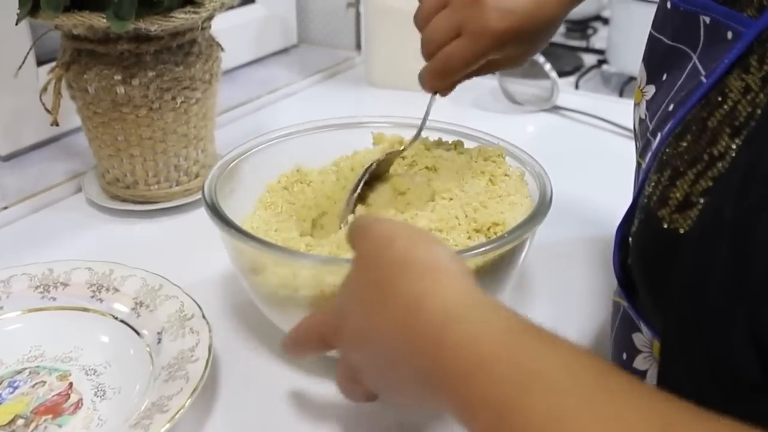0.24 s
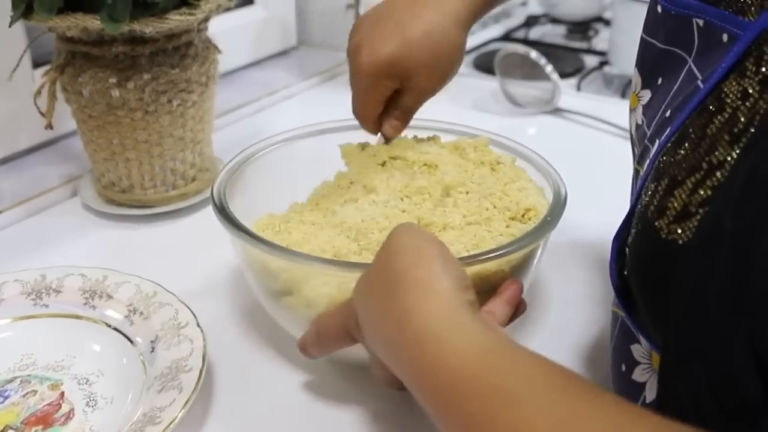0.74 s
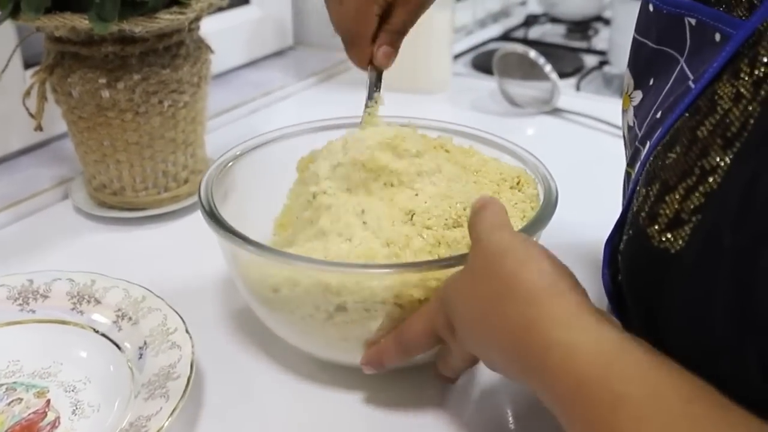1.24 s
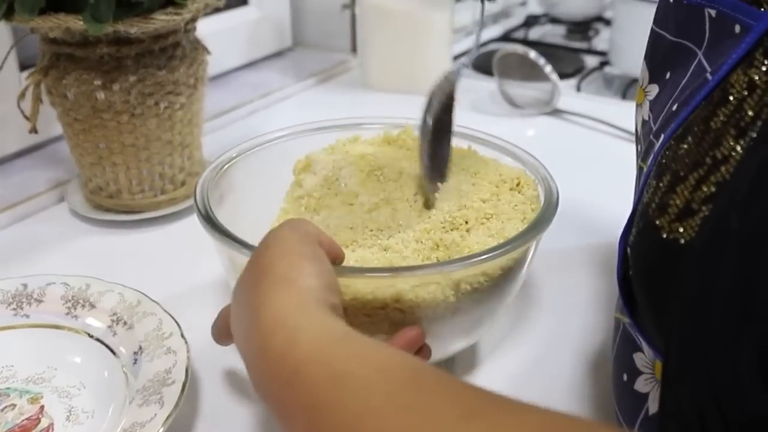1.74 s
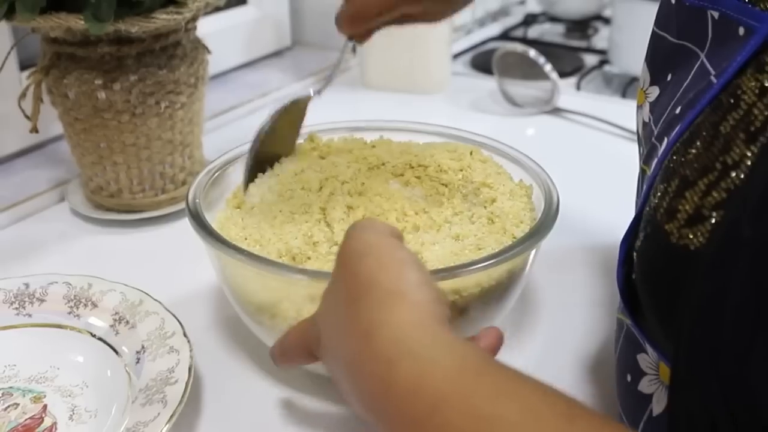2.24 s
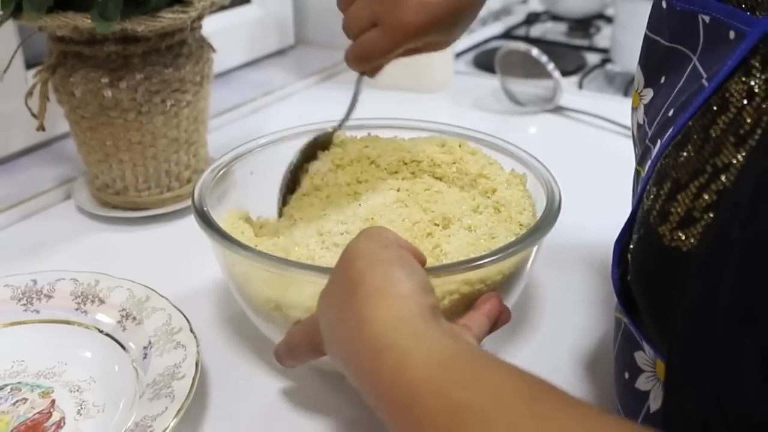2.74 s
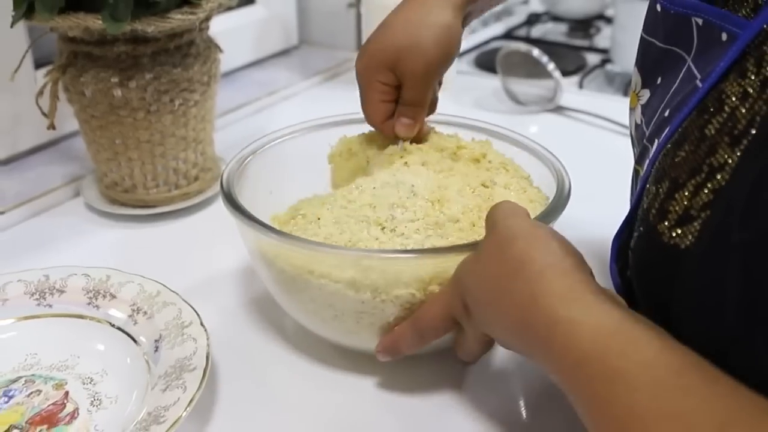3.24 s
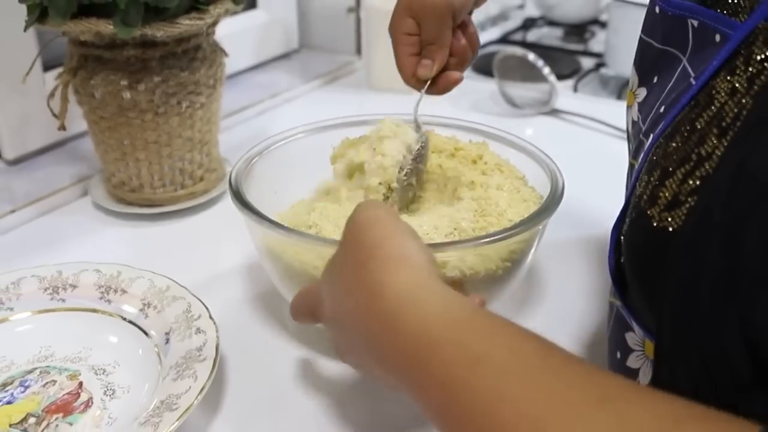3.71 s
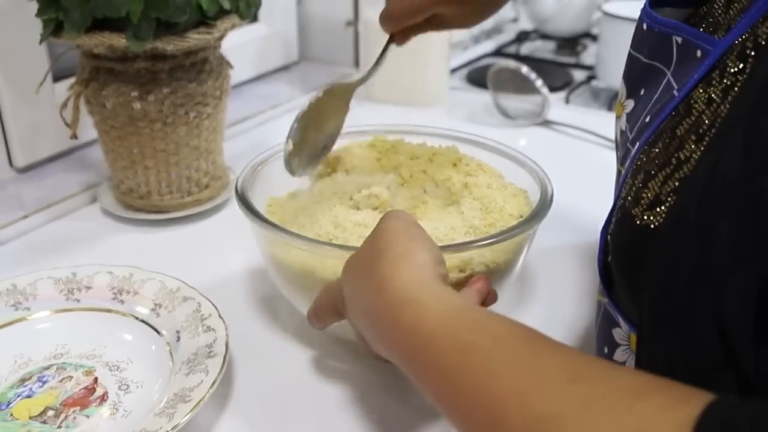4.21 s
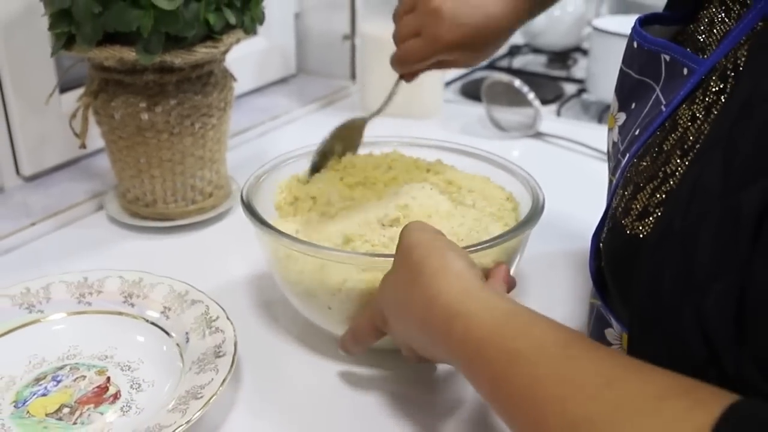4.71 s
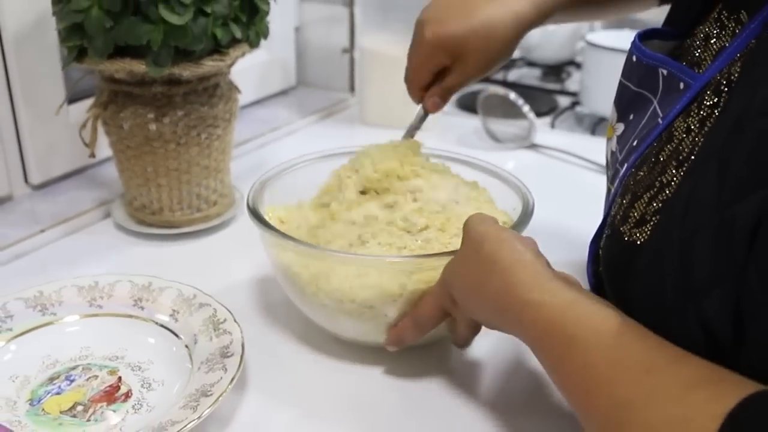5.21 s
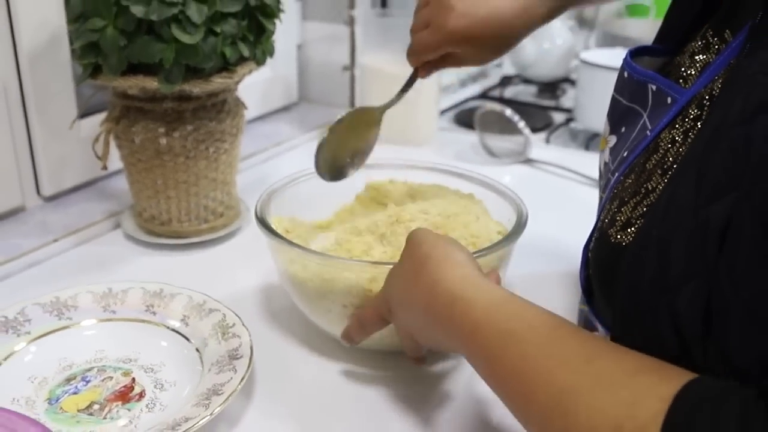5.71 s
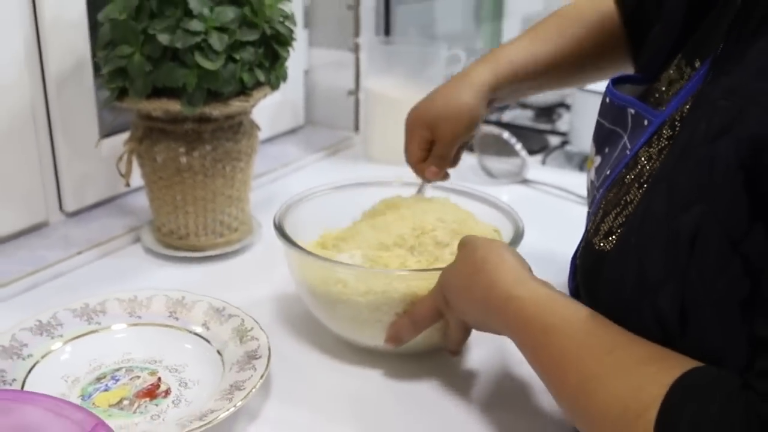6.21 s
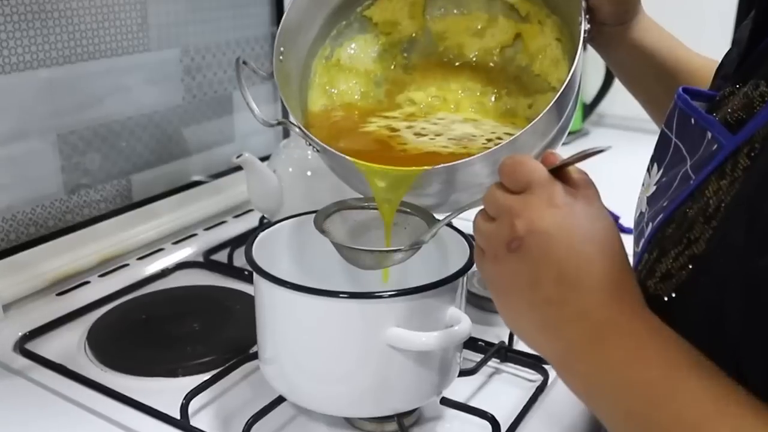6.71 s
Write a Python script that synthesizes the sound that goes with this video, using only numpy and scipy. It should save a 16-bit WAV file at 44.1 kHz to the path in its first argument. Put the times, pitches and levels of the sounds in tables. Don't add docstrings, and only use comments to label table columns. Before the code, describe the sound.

Close stereo microphone, hard tiled room with short echo. Soft gritty spoon strokes, dull bowl thuds and one tiny squeak open the scene, followed by a loud, slightly clipped glass clink. Quieter handling and a few further clinks follow over nervous hollow rattling and ticking. A momentary dropout leads to padded knocks of a sieve on an enamel pot.

```python
import sys
import numpy as np
from scipy import signal
from scipy.io import wavfile

SR = 44100
rng = np.random.default_rng(int(sys.argv[2]) if len(sys.argv) > 2 else 0)


def wav_record(signal):
    frames = np.transpose(np.atleast_2d(signal))
    bounded = np.clip(frames, -1, 1)
    quanta = np.round(bounded * 32767).astype(np.int16)
    wavfile.write(sys.argv[1], SR, quanta)


def elevation(decibels):
    levels = np.asarray(decibels, float)
    return 10 ** (levels / 20)


N = 306486
T = np.arange(N) / SR

# (time [s], level given to the modes at 4.7, 1.1, 2.1 and 6.3 kHz [dB] each)
CLINKS = [
    (0.6021, -6, -15, -14, -16),
    (2.7661, -33, -28.5, -38.5, -29.5),
    (2.8159, -34.5, -41, -28.5, -39.5),
    (4.7802, -14.5, -22, -20.5, -26.5),
    (5.919, -16, -21.5, -15, -20.5),
]
CLINK_HZ = [4680, 1130, 2100, 6270, 3290, 12000]
# (mode shift [Hz], left-right level [dB], 3.3 over 4.7 kHz [dB], 12 over 6.3 kHz [dB])
LOADS = [(-5, -0.5, -8.5, 4.5), (11, 0, -6.5, -36), (-3, 0, -10, 13), (-7.5, -2, -11.5, -1.5),
         (28, -3, -9, -6)]
# (bounce delay [s], bounce level [dB], decay stretch [ratio], slow ring level [dB])
ENDINGS = [(.0062, -4.5, 0.66, 0.8), (0.0045, 0, 0.49, -8), (0.005, -13, 1, -2), (0.0054, -4.5, 0.99, -2.3),
           (.004, -14, .9, 0.9)]
# (frequency [Hz], level [dB], t60 [s], left-right phase [rad])
BOWL = [(442.6, -18.5, .08, -6.5), (1132, 0.5, 0.11, 1.99), (1160, -5, 0.022, -2), (1674, -13, 0.028, -1),
        (2090, -1.5, 0.058, 0.96), (2226, -3.5, 0.063, -4.5), (2980, -9, 0.051, -11.5),
        (3150, -17, 0.05, 1.5), (3290, 10, 0.06, 1.23), (3335, 4, 0.067, -0.5), (3560, -20, 0.0442, -5.5),
        (3893, -4.5, 0.042, 0.5), (4460, 0, 0.041, 3), (4722, 1.5, 0.088, -1.4), (4645, -10.5, 0.032, 1.5),
        (6225, 4, 0.048, 1.83), (7370, -4, 0.12, 2.1), (6720, -11.5, 0.047, -2), (7170, -6, 0.099, 9.5),
        (7920, -6, 0.046, 0.4), (8300, -16.5, 0.05, 4), (8940, -11.5, 0.082, 3), (9300, -18, 0.03, -2.5),
        (9600, -13, 0.064, 0), (9980, -15.5, .07, 1.8), (10700, -21, 0.086, 0.2), (11760, -19, 0.077, 0),
        (12960, -15, .14, 1.1), (12800, -23.5, 0.08, -0.1), (14300, -29.5, 0.06, 1.4)]
# (frequency [Hz], level [dB], t60 [s], left-right phase [rad])
SLOW_RING = [(1126, -22, .35, 0.5), (1194, -24, .35, -2.5), (2086, -16, .4, 2), (2059, -21.5, .3, -1),
             (2990, -22.5, .3, .5), (3270, -7.5, .4, 1.5), (3312, -10, .36, -1), (3432, -19, .3, 2.5),
             (4687, -13, 0.39, 1.5), (4780, -19.5, 0.32, -1.5), (6288, -22, .35, 2)]
# (start [s], length [s], level [dB], brightest frequency [Hz], spoon ring level [dB])
SWISHES = [(0.255, 0.067, -49, 3900, -2.5), (0.4, 0.008, -44, 3620, 0.5), (0.34, 0.054, -39.5, 1470, -20),
           (0.387, 0.031, -42, 3040, -25), (0.84, 0.023, -41, 6200, -17), (2.382, 0.054, -51, 2000, -21.5),
           (3.029, 0.042, -38.5, 3500, -24), (3.049, 0.027, -38.5, 10400, -8),
           (3.102, 0.041, -39.5, 2500, -26), (3.123, 0.127, -50.5, 3250, -26),
           (5.157, 0.029, -43.5, 2740, -13), (6.397, 0.23, -53.5, 6400, -6.5),
           (6.824, 0.019, -45, 2500, -11), (6.922, 0.022, -46, 2500, -13)]
# (frequency [Hz], level [dB], t60 [s])
SPOON = [(3600, -24, 0.037), (4670, -37.5, 0.07), (5600, -32, .08), (9410, -24.5, 0.038)]
# (time [s], peak level [dB], frequency [Hz], t60 [s])
BUMPS = [(.418, -30, 338.4, 0.09), (.604, -23, 414, 0.074), (0.621, -35, 193, 0.38),
         (.85, -40.5, 427, 0.19), (0.9642, -23.5, 202, 0.05), (0.99, -34, 128, 0.14),
         (2.389, -25.5, 338, 0.13), (2.416, -26, 345, 0.095), (2.444, -36, 342.3, 0.34),
         (2.439, -32, 148, 0.14), (2.771, -32.5, 300, 0.17), (2.8, -32, 155, 0.15),
         (3.045, -38.5, 402, 0.43), (3.113, -20.5, 438, 0.04), (3.131, -37.5, 398, 0.3),
         (4.789, -38.5, 398.4, 0.56), (5.17, -37, 508, 0.034), (5.266, -39, 250, 0.093),
         (5.92, -11, 1545, 0.034), (5.922, -28.5, 331, 0.061), (5.931, -36, 171.3, 0.4)]
# (time [s], peak level [dB], frequency [Hz], t60 [s], left-right level [dB])
TAPS = [(.338, -33, 1350, 0.13, 3), (0.349, -22.5, 1400, 0.017, 13), (0.389, -30.5, 1220, 0.11, 12),
        (.413, -28.5, 1160, 0.052, 2), (0.4166, -18.5, 1220, 0.026, 10), (.422, -20.5, 537, 0.025, 8.5),
        (2.9476, -26.5, 1320, 0.032, 11), (3.125, -52, 2490, .25, 1.5), (3.112, -24, 1200, 0.032, -3)]
# (time [s], frequency [Hz], level [dB])
SQUEAK = [
    (0.361, 880, -41),
    (0.368, 823, -27),
    (0.383, 756, -19.5),
    (0.393, 830, -27.5),
    (.4, 740, -76),
]
# (time [s], peak level [dB], rim ring level [dB], damping delay [s], damping depth [dB])
KNOCKS = [
    (6.523, -19, 3, 0.095, -25),
    (6.7195, -20.5, -3, 0.077, -5),
    (6.733, -23.5, -11, 0.076, -19),
    (6.826, -36.5, 3.5, .6, -6),
]
# (level given to the modes at 350, 455, 475, 550 and 610 Hz [dB] each)
LANDINGS = [(2.5, 14.5, -6.5, 5, 5), (5.5, -19, 8, -8, -1), (-11, -24, 6, 1, 0.5), (0, 7, 4, 7.5, 11)]
LANDING_HZ = [350, 455, 475, 550, 610]
# (level at 0.9, 3.4 and 3.6 kHz [dB] each, lag of the ring [s])
CHIMES = [(1, 4, 1.4, .008), (-3, 4.5, 5.3, .004), (-15.5, -5, 3, 0.0033), (-2, -8, 8.7, 0.00301)]
CHIME_HZ = [900, 3405, 3550]
# (frequency [Hz], level [dB], t60 [s])
POT = [(193, 4.5, 0.37), (250, -7, 0.78), (349, -8, 0.21), (394, -19, 0.5), (458, -8.5, 0.22),
       (476, -3.5, 1), (478, -14.5, 0.72), (515, -21, .25), (518, -17.5, 0.27), (552, -5.5, 0.2),
       (598, -9.5, 0.17), (690, -17.5, 0.4)]
# (frequency [Hz], level [dB], t60 [s])
RIM = [(806, -20, 0.22), (900, -14, 0.13), (1160, -21.5, 0.19), (1195, -25.5, .3), (1630, -37, 0.38),
       (1938, -35, 0.81), (2180, -33, .15), (2760, -40, .4), (3410, -26, 0.28), (3580, -28.5, 0.2),
       (3585, -35.5, 0.87), (3620, -43, .6), (5300, -44, .25), (5600, -35, 0.2), (7540, -42, 0.13)]
# (low edge [Hz], high edge [Hz], t60 [s], level [dB])
KITCHEN = [(100, 640, 0.75, -8.5), (999, 2520, 0.49, -3.5), (2500, 3720, 0.38, -11.5),
           (3900, 5500, 0.41, -8), (5710, 10400, 0.37, -8), (9000, 16000, 0.2, -15.5)]
# (time [s], level [dB])
RATTLE = [(0.0, -38), (0.52, -46), (1.45, -44.5), (1.57, -49.5), (2.13, -42.5), (2.48, -46), (3.19, -44),
          (3.7, -42), (3.97, -42.5), (4.26, -45), (4.49, -45.5), (4.65, -43), (5.34, -41.5), (5.88, -43.5),
          (6.14, -41), (6.37, -44), (6.66, -42), (6.95, -46.5)]
# (frequency [Hz], width [Hz], level [dB])
HOUSING = [(1200, 22, 4), (1243, 14, 5), (1350, 28, 6), (1400, 125.6, 12), (1560, 24, -11)]
# (time [s], peak level [dB])
SHAKES = [(0.0287, -31.5), (0.0833, -45), (0.1605, -45), (0.9336, -31), (1.1967, -24.5), (1.2323, -28),
          (1.2641, -25), (1.4099, -28.5), (1.7777, -28.5), (2.2363, -29.5), (3.0773, -30), (3.1813, -30),
          (3.4035, -37), (3.4348, -28), (3.5669, -27), (3.6184, -33), (3.6336, -27.5), (3.6807, -32),
          (3.7772, -29.5), (3.8200, -27.5), (3.8669, -30), (3.9215, -36), (3.9520, -36), (3.98, -27.5),
          (4.0915, -29), (4.1310, -28), (4.2302, -26.5), (4.2501, -30.5), (4.8712, -28), (4.8967, -30),
          (4.9638, -33), (5.0004, -29), (5.0310, -40), (5.0988, -24), (5.1404, -25.5), (5.161, -25),
          (5.2045, -24.5), (5.2209, -29), (5.2484, -39), (5.2738, -28), (5.3587, -31.5), (5.4027, -33),
          (5.4385, -28.5), (5.467, -30), (5.5179, -30), (5.565, -35), (5.6161, -34), (5.6406, -25),
          (5.7036, -33), (5.7249, -27), (6.0068, -25), (6.0235, -34), (6.056, -31), (6.0974, -35),
          (6.1362, -26), (6.2222, -30), (6.2538, -27.5), (6.5537, -43), (6.5839, -37), (6.6302, -36),
          (0.0112, -41), (0.098, -42), (0.1806, -33), (0.201, -34.0), (0.2278, -31), (0.4635, -31.5),
                (0.7611, -32), (0.798, -34), (1.286, -32), (1.355, -28), (1.3878, -33), (1.48, -30),
                (1.5358, -32.5), (1.595, -29.5), (1.9191, -33.5), (2.0203, -32), (2.088, -39), (2.184, -31),
                (2.222, -30), (2.276, -38), (2.408, -29), (2.4373, -32), (2.545, -34), (3.0605, -29),
                (3.1282, -31), (3.3438, -33), (3.489, -39), (3.7318, -37), (4.038, -41), (4.0673, -31),
                (4.185, -34.5), (4.419, -31), (4.485, -31), (4.507, -32), (4.6034, -33), (4.6223, -29.5),
                (4.6703, -31), (4.688, -32), (4.709, -31), (4.766, -33), (4.9224, -40), (5.08, -32),
                (5.115, -38), (5.4826, -31), (5.5851, -37), (5.672, -30), (5.885, -36), (6.0716, -37),
                (6.1156, -31), (6.171, -37), (6.204, -37), (6.297, -31), (6.318, -37), (6.346, -33),
                (6.5377, -38), (6.5986, -31), (6.71, -39), (6.7897, -39), (6.806, -31.5), (6.8248, -33)]
# (time [s], peak level before a 3 dB cut [dB])
MORE_SHAKES = [(0.161, -35), (0.543, -30), (0.935, -31), (0.951, -33), (0.97, -38), (1.029, -31),
               (1.083, -35), (1.286, -26), (1.388, -31), (1.504, -27.5), (1.537, -32.5), (1.612, -32),
               (1.733, -28), (1.801, -32), (1.85, -30), (1.893, -32.5), (2.043, -36), (2.144, -39),
               (2.276, -33), (2.568, -30), (2.697, -29), (2.897, -36), (2.948, -26), (3.247, -35),
               (3.269, -29), (3.436, -24.5), (3.49, -33), (3.547, -30), (3.62, -32), (3.754, -33.5),
               (3.8, -34), (3.832, -26), (3.922, -31), (3.938, -28.5), (4.039, -26), (4.141, -30),
               (4.336, -35), (4.447, -29), (4.539, -30), (4.985, -32), (5.02, -25), (5.079, -35),
               (5.118, -34), (5.25, -31), (5.275, -27), (5.439, -28.5), (5.566, -26), (5.617, -30),
               (5.705, -35), (5.726, -24), (6.098, -31), (6.32, -27), (6.429, -35), (6.475, -34),
               (6.493, -39), (6.632, -28), (6.711, -33), (6.79, -29)]
# (time [s], peak level [dB])
TICKS = [(0.0207, -52), (0.0786, -44), (0.101, -43), (0.1168, -41.5), (0.162, -42), (0.2, -40),
         (0.4999, -40), (0.9284, -41), (1.1975, -41), (1.2375, -41), (1.3616, -41.5), (1.4097, -45),
         (1.5395, -39), (1.7082, -48), (2.0195, -43), (2.0851, -43.5), (2.5459, -41), (2.7399, -49),
         (2.9266, -38), (2.9474, -50), (2.992, -39), (3.0148, -40), (3.1812, -45), (3.2948, -43),
         (3.4318, -42.5), (3.5213, -39.5), (3.5721, -40), (3.6475, -41), (3.6901, -42), (3.7783, -44),
         (3.8138, -40), (3.8538, -39), (3.9877, -41), (4.1325, -42), (4.4186, -41), (4.5067, -44),
         (4.5445, -42), (4.6656, -43), (4.6804, -42), (4.7611, -39), (5.0179, -40), (5.045, -43),
         (5.0788, -46), (5.155, -44), (5.1754, -47), (5.1934, -43), (5.3579, -39.5), (5.3911, -42.5),
         (5.4293, -41), (5.4668, -47), (5.5165, -40.5), (5.6171, -43.5), (5.66, -44), (5.6813, -43),
         (5.706, -42), (6.3007, -45), (6.3488, -43.5), (6.6240, -42.5), (6.6643, -45), (6.8388, -47),
         (0.038, -44), (.051, -46.5), (1.058, -45.5), (1.223, -44), (1.31, -47), (1.484, -46),
               (2.192, -45), (2.442, -47), (2.674, -52), (2.9165, -44), (4.234, -47), (4.953, -42),
               (5.117, -47), (5.144, -42), (5.261, -46), (5.311, -49), (5.486, -45), (5.562, -45),
               (5.59, -48), (5.885, -50), (6.14, -39.5), (6.284, -44.5), (6.317, -45), (6.574, -41),
               (6.711, -42.5)]
# (frequency [Hz], level [dB], t60 [s])
TICK_MODES = [(2000, -9, 0.035), (2190, -8, 0.013), (2360, -7.5, 0.0045), (2844, -26, 0.003),
              (3500, -6, 0.0074), (4200, -25.5, 0.0046)]
# (frequency [Hz], level per Hz [dB])
HUM = [(40, -20.5), (75, -6.5), (100, -4), (250, -0.5), (400, -4.5), (1000, -9.5), (1700, -7.5),
       (2300, -12.5), (3500, -16.5), (7000, -24), (11000, -34), (15000, -38)]
# (frequency [Hz], left-right likeness [-1 to 1])
LIKENESS = [(60, 0.58), (180, 0.9), (550, 0.57), (1650, -0.33), (4970, 0.073), (15000, -0.0073)]
# (middle [s], length [s], level [dB])
PUFFS = [
    (0.986, 0.2, -44.5),
    (3.123, 0.21, -49),
    (3.812, 0.35, -56),
    (6.27, 0.12, -74.5),
]
# (frequency [Hz], level [dB])
MAINS = [(48, -67.5), (98, -64.5)]
# (start [s], end [s])
CUT_S = (6.3650, 6.4056)


def rms_one(x):
    return x / np.sqrt(np.mean(x ** 2) + 1e-20)


def at_hz(points, hz):
    table_hz, value = np.array(points).T
    return np.interp(np.log(hz), np.log(table_hz), value)


def drift(rate_hz):
    knots = rng.standard_normal(int(N / SR * 60) + 2)
    r = np.exp(-2 * np.pi * rate_hz / 60)
    smooth = rms_one(signal.lfilter([1], [1, -r], knots))
    return np.interp(T * 60, np.arange(len(knots)), smooth)


def ring(clicks, hz, t60, phase=0.):
    r = elevation(-60 / (t60 * SR))
    w = 2 * np.pi * hz / SR
    return signal.lfilter([np.sin(phase), r * np.sin(w - phase)], [1, -2 * r * np.cos(w), r * r], clicks + 1e-18)


def band(x, low_hz, high_hz):
    return signal.sosfilt(signal.butter(2, [low_hz, min(high_hz, .45 * SR)], "band", fs=SR, output="sos"), x)


def clicks_at(s, db):
    out = np.zeros(N)
    out[np.round(np.asarray(s) * SR).astype(int)] = elevation(db)
    return out


def panned(x, pan_db):
    return np.outer(elevation(np.array([pan_db, -pan_db]) / 2), x)


def widened(mid, side, alike):
    return np.sqrt(1 + alike) * mid + np.sqrt(1 - alike) * side * [[1], [-1]]


def bowl(crack_db, crack_t60):
    out = np.zeros((2, N))
    span = T[:SR // 2]
    swell = np.minimum(span / 0.00054, 1)
    order = np.argsort(CLINK_HZ)
    for clink, load, ending in zip(CLINKS, LOADS, ENDINGS):
        s, *given_db = clink
        shift_hz, pan_db, paired_db, bright_db = load
        lag, bounce_db, stretch, slow_db = ending
        given_db += [given_db[0] + paired_db, given_db[3] + bright_db]
        crack_level = elevation(np.mean(given_db[:-1]) + crack_db - 60 * span / crack_t60)
        sound = crack_level * band(rng.standard_normal((2, len(span))), 490, 7000)
        slow = [(hz, db + slow_db, t60, phase) for hz, db, t60, phase in SLOW_RING]
        luck = np.append(rng.standard_normal(len(BOWL)), np.zeros(len(slow)))
        for (hz, db, t60, phase), q in zip(BOWL + slow, luck):
            blow_db = np.interp(hz, np.array(CLINK_HZ)[order], np.array(given_db)[order])
            level_db = blow_db + db + 4.5 + 1.2 * q
            turn = 2 * np.pi * (hz + shift_hz) * span + np.array([[phase], [-phase]]) / 2
            sound = sound + elevation(level_db - 60 * span / (stretch * t60)) * np.sin(turn)
        bounce = np.r_[1, np.zeros(round(lag * SR)), elevation(bounce_db)]
        sound = signal.lfilter(bounce, [1], swell * sound)
        a = round(s * SR)
        out[:, a:a + len(span)] += elevation(np.array([[pan_db], [-pan_db]]) / 2) * band(sound, 260, 12000)
    return out


def swishes(density):
    out, drive = np.zeros((2, 2, N))
    for s, length, db, hz, spoon_db in SWISHES:
        a, count = round(s * SR), round(length * SR)
        draw = rng.standard_normal((3, count))
        crumbs = draw[:2] * (0.49 + 2.4 * (draw[2] > 2.6 - density))
        grain = rms_one(band(band(crumbs, hz / 6, hz * 1.3), hz / 6, hz * 2.2))
        stroke = elevation(db) * np.hanning(count) ** .5 * grain
        out[:, a:a + count] += stroke
        drive[:, a:a + count] += elevation(spoon_db) * stroke
    return out + sum(elevation(db) * ring(drive, hz, t60) for hz, db, t60 in SPOON)


def bumps():
    out = np.zeros((2, N))
    span = T[:SR // 4]
    counter_pan_db = 2
    for s, db, hz, t60, pan_db in TAPS + [(*row, counter_pan_db) for row in BUMPS]:
        fade = elevation(-60 * span / t60) * np.minimum(span * hz / 2.0, 1)
        thud = band(rng.standard_normal(len(span)), hz * .6, min(hz * 2.5, hz + 420))
        thud = band(thud, hz * 0.19, min(hz * 7.0, hz + 650))
        note = np.sin(2 * np.pi * hz * span) + 5.1 * thud
        a = round(s * SR)
        out[:, a:a + len(span)] += panned(elevation(db - 2.0) * fade * note, pan_db)
    return out


def squeak():
    s, hz, db = np.transpose(SQUEAK)
    phase = 2 * np.pi * np.cumsum(np.interp(T, s, hz)) / SR
    level = elevation(np.interp(T, s, db, left=-200, right=-200))
    flutter = 1 + 0.29 * np.sin(phase / 7.6)
    return level * flutter * np.array([np.sin(phase), 0.62 * np.sin(phase - 1.2)])


def pot():
    out = np.zeros(N)
    for (s, db, rim_db, damped, depth_db), landing_db, (*chime_db, lag) in zip(KNOCKS, LANDINGS, CHIMES):
        blow, scrape = clicks_at([s], [db]), rng.standard_normal(N)
        soft = band(band(blow + 1e-12 * scrape, 390, 608), 208, 620) * elevation(2.5)
        body = sum(elevation(level_db + np.interp(hz, LANDING_HZ, landing_db)) * ring(soft, hz, t60)
                   for hz, level_db, t60 in POT)
        late = clicks_at([s + lag], [db + rim_db])
        rim = sum(elevation(level_db + np.interp(hz, CHIME_HZ, chime_db)) * ring(late, hz, t60)
                  for hz, level_db, t60 in RIM)
        scuff = ring(blow, 4.7, 0.13, 0.57) * elevation(rim_db - 13.0) * band(scrape, 500, 5500)
        damping = elevation(np.clip(-600 * (T - s - damped), depth_db, 0))
        out += (body + scuff) * damping + rim * np.clip((T - s - lag) / 0.0032, 0, 1)
    return panned(out, 1.0)


def kitchen(x):
    span = T[:SR]
    white = rng.standard_normal((2, SR))
    echo = sum(elevation(db - 60 * span / t60) * band(np.roll(white, 6100 * k, axis=1), low, high)
               for k, (low, high, t60, db) in enumerate(KITCHEN))
    echo = echo * np.clip((span - .006) / 0.025, 0, 1) * elevation(-26.5)
    return signal.fftconvolve(x.mean(axis=0, keepdims=True), echo, axes=1)[:, :N]


def rattle(effort_db, per_s, spread_db, alike):
    born = rng.random((2, N)) < per_s * elevation(3.0 * drift(9.0)) / SR
    height = elevation(spread_db * np.minimum(rng.exponential(1, (2, N)), 4))
    knocks = born * height * rng.choice([-1, 1], (2, N))
    mid, side = sum(elevation(db) * np.sqrt(width) * ring(np.roll(knocks, 977 * k, axis=1), hz, 3.5 / width)
                    for k, (hz, width, db) in enumerate(HOUSING))
    return rms_one(widened(mid, side, alike)) * elevation(effort_db - 0.5 + 2.2 * drift(5.6))


def small_events(effort_db, per_s, over_db):
    small = np.flatnonzero(rng.random(N) < per_s / SR)
    db = effort_db[small] + over_db - rng.standard_normal(len(small))
    return np.transpose([T[small], db])


def shakes(effort_db):
    small = small_events(effort_db, per_s=1, over_db=2.5)
    s, db = np.concatenate([SHAKES, np.add(MORE_SHAKES, [0, -3.0]), small]).T
    luck = rng.standard_normal((len(s), len(HOUSING)))
    rung = sum(ring(clicks_at(s, db + level_db - 52.5 + 1.27 * luck[:, k]), hz, 1.54 / width)
               for k, (hz, width, level_db) in enumerate(HOUSING))
    rise = T[:2000] / 0.0018
    push = rise * np.exp(1 - rise) * np.sin(2 * np.pi * 1410 * T[:2000])
    return signal.fftconvolve(rung, push)[:N]


def ticks(effort_db):
    small = small_events(effort_db, per_s=2, over_db=-3)
    s, db = np.concatenate([TICKS, small]).T
    luck, contacts = rng.standard_normal((len(s), len(TICK_MODES))), rng.standard_normal(N)
    fade = [1, -elevation(-60 / (0.05 * SR))]
    out = np.zeros(N)
    for k, (hz, level_db, t60) in enumerate(TICK_MODES):
        first = clicks_at(s, db + level_db - 16.5 + 1.5 * luck[:, k])
        cluster = contacts * signal.lfilter([1], fade, first + 1e-18)
        out += ring(cluster + 6.0 * first, hz, t60)
    return out


def appliance(per_s, spread_db, alike):
    effort_db = np.interp(T, *np.transpose(RATTLE))
    steady = rattle(effort_db, per_s, spread_db, alike)
    single = shakes(effort_db) + ticks(effort_db)
    far = np.roll(single, 4)
    return steady * elevation(np.array([[1.3], [-1.3]])) + np.array([elevation(4.0) * far, elevation(1.7) * single])


def hum(patchy_db):
    out = 0
    edges = 24 * 2 ** np.arange(0, 9.6, .5)
    white = rng.standard_normal((2, 2, N))
    for k, (low, high) in enumerate(zip(edges, edges[1:])):
        mid, side = band(white[k % 2], low, high)
        hz = np.sqrt(low * high)
        alike = np.clip(at_hz(LIKENESS, hz), -1, 1)
        gain = elevation(at_hz(HUM, hz) + patchy_db * drift(3.8))
        out = out + gain * widened(mid, side, alike)
    return elevation(-47.5) * rms_one(out) * elevation(np.array([[.8], [-.8]]))


def rumble():
    shared, own = band(rng.standard_normal((2, N)), 35, 65)
    level = np.full(N, elevation(-66.5))
    for s, length, db in PUFFS:
        level = level + elevation(db) * np.cos(np.pi * np.clip((T - s) / length, -.5, .5)) ** 2
    drone = sum(elevation(db + 3.0 * drift(2.5)) * np.sin(2 * np.pi * hz * T) for hz, db in MAINS)
    return level * rms_one(np.array([1.3 * shared + .3 * own, shared - .3 * own])) + drone


def scene():
    glass = bowl(crack_db=14.0, crack_t60=0.028)
    dull = swishes(density=0.82) + bumps()
    sieve = pot()
    near = glass + dull + squeak() + sieve
    echo = kitchen(glass + elevation(-8.5) * dull + elevation(-5.0) * sieve)
    behind = appliance(per_s=630, spread_db=1.5, alike=0.59) + hum(patchy_db=1.0) + rumble()
    return near + echo + behind


def low_pass(x):
    return signal.sosfilt(signal.butter(12, 15820, fs=SR, output="sos"), x)


def record(dry):
    over_db = np.maximum(20 * np.log10(np.abs(dry).max(axis=0) + 1e-9) + 7.9, 1e-9)
    held_db = np.maximum.accumulate(over_db + 129.69 * T) - 130.01 * T
    late = np.exp(-1 / (0.01085 * SR))
    x = dry * elevation(-.55 * signal.lfilter([1 - late], [1, -late], held_db))
    x = signal.sosfilt(signal.butter(3, 38, "high", fs=SR, output="sos"), x)
    excess = x - np.clip(x, -1, 1)
    x = np.clip(x - band(excess, 140, 19000), -1, 1)
    x = signal.sosfilt(signal.cheby2(10, 50, 16400, fs=SR, output="sos"), x)
    x = x * ((T < CUT_S[0]) | (T > CUT_S[1]))
    return low_pass(x)


dry = scene()
out = record(dry)
wav_record(out)
```